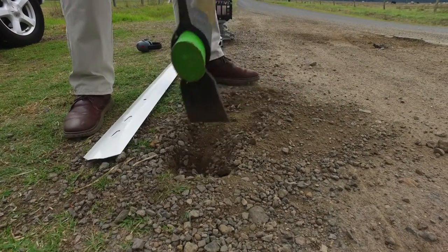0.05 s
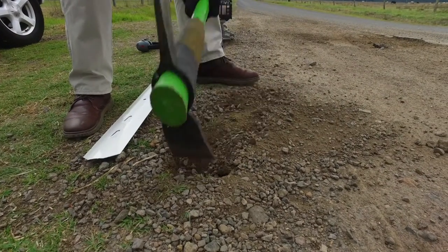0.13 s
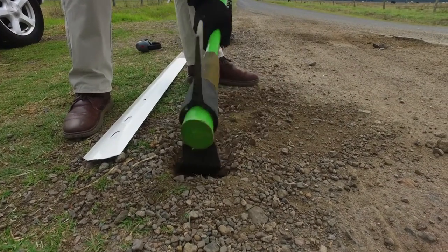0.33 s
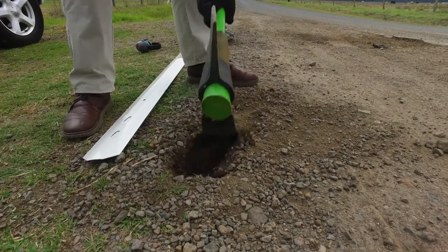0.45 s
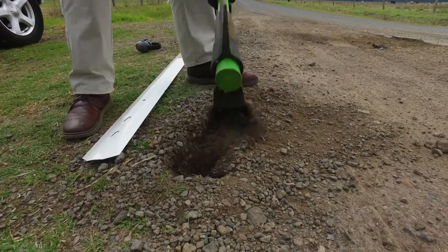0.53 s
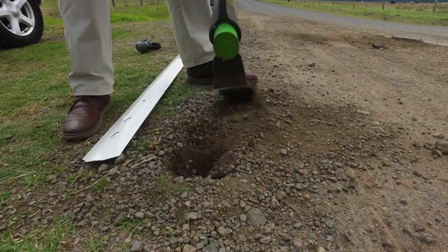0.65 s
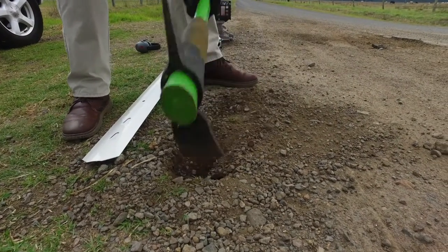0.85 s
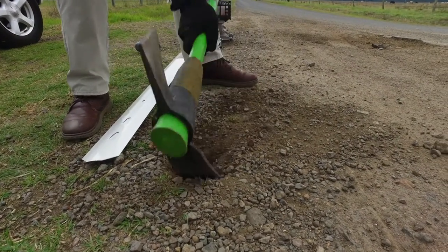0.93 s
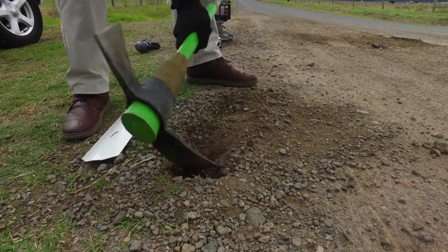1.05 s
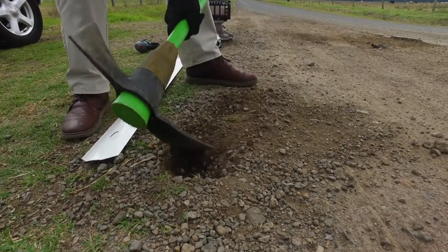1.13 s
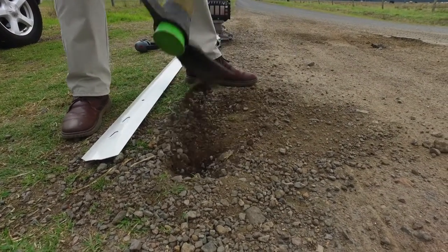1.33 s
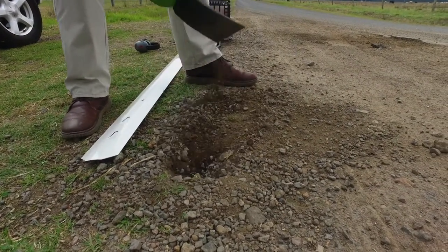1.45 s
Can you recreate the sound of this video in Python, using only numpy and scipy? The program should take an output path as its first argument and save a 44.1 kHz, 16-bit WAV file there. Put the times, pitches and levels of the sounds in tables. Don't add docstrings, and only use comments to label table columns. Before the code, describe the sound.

A steel mattock chops twice into hard roadside gravel, crunching, knocking stones, then dragging free with pebbles trickling

```python
import sys
import numpy as np
from scipy import signal
from scipy.fft import rfft, irfft
from scipy.io import wavfile
from scipy.ndimage import map_coordinates

SR = 44100
rng = np.random.default_rng(int(sys.argv[2]) if len(sys.argv) > 2 else 0)


def store_wav(level_fs):
    pcm = np.round(np.clip(np.atleast_2d(level_fs), -1, 1) * 32767)
    wavfile.write(sys.argv[1], SR, pcm.T.astype(np.int16))


def voltage_ratio(decibels):
    exponent = np.asarray(decibels, float) / 20
    return 10 ** exponent


N = 66150

# start_s, length_s, force_db, soil_share_db, steel_shake_db
BITES = [(0.2265, 0.019, -26.5, -5.5, -13.5), (0.2429, 0.0053, -26.5, 3, -32),
         (0.258, 0.035, -52.5, 2.5, -16), (0.295, 0.011, -39, 4, -18), (0.313, 0.026, -42, -2.5, -31),
         (0.348, 0.013, -47, 2, -8), (0.369, 0.022, -42.5, -6, -14), (0.394, 0.047, -43, -1, -20),
         (0.454, 0.0084, -48.5, -14, -2), (0.469, 0.0063, -42, 5.5, -28), (0.481, 0.031, -49.5, -6.5, -9.5),
         (0.9463, 0.005, -21, -46, -20), (0.953, 0.016, -27.5, -4, -33), (0.98, 0.02, -55, 5, -22),
         (1.02, 0.0052, -33, -8, -15), (1.031, 0.0096, -36.5, -4, -19), (1.054, .006, -40, -8.5, -26),
         (1.0699, 0.013, -34.5, -2, -20), (1.09, 0.021, -35.5, -7.5, -14.5), (1.115, 0.012, -30, -5, -19),
         (1.132, 0.013, -29.5, -11, -5), (1.149, 0.04, -37, -5, -4.5), (1.182, 0.027, -39, -5.5, -10.5),
         (1.227, 0.021, -46.5, -7.5, -5)]
BITE_ATTACK_S, BITE_T60_S = 0.0011, 0.022
CRUNCH_PER_S, CRUNCH_SPREAD_DB = 9000, 3
# pitch_hz, level_db
STONE_TONE = [(350, -28.5), (600, -4.5), (1730, -20.5), (3780, -1.5), (5480, -4.5), (7000, -10),
              (14600, -38), (15400, -39)]
# pitch_hz, level_db
SOIL_TONE = [(80, -38.5), (200, 2), (380, 0), (700, 0.5), (1200, -5), (2500, -6), (5000, -19), (12000, -43)]
CHIP_HZ, CHIP_SPREAD, CHIP_CYCLES, CHIP_DB = 3220, 0.41, 4.4, -10.5

BLADE_HELD_HZ = [910, 1225, 2400, 3150, 3450, 3920, 5965, 7745, 8840, 9910, 11700, 13100, 13750, 14700]
# level_db, t60_s
BLADE_HELD = [(-1.5, 0.037), (-5.5, 0.032), (-14, 0.025), (-3, 0.037), (-5, 0.047), (-8.5, 0.054),
              (-8, 0.048), (-15.5, 0.05), (-12, 0.031), (-19.5, 0.027), (-17.5, 0.051), (-20, 0.032),
              (-13.5, 0.032), (-19, 0.063),
              (-7, 0.045), (-7, 0.036), (-15, 0.07), (-19, .06), (-11, 0.044), (-23.5, 0.098), (-13.5, 0.07),
            (-19.5, 0.036), (-16, .07)]
BLADE_FREE_HZ = [2239, 3585, 4300, 6492, 6760, 7208, 8258, 8866, 9916, 11700, 12100, 13080, 13710, 14820]
# level_db, t60_s
BLADE_FREE = [(-10, 0.084), (-1, 0.072), (-4, 0.045), (-7.5, 0.29), (-11, 0.39), (-24, .15), (-7, 0.18),
              (-11.5, 0.08), (-23, 0.15), (-17, 0.12), (-10, 0.16), (-18, 0.16), (-19, 0.13), (-13.5, 0.2),
              (-6, .07), (-10, 0.068), (-19, .04), (-10.5, 0.065), (-19, 0.067), (-26, .13), (-32, .13),
            (-31, .13), (-15, .12)]
MORE_HELD_HZ = [1900, 2100, 4920, 5530, 6500, 6720, 8280, 10400, 12700]
MORE_FREE_HZ = [3930, 4900, 5620, 6020, 7720, 9200, 10700, 11000, 12600]
# pitch_hz, level_db
STEEL_TOP = [(14900, 0), (15300, -35)]
FREED_S, FREED_RISE_S, HELD_SHARE = 1.129, 0.026, 0.17
HELD_DB, FREE_DB = -15, -8.5
DAMP_DB, DAMP_PER_S = 3.5, 40

# start_s, peak_db, pitch_hz,
# t60_s
KNOCKS = [(0.2293, -23.5, 4000, 0.013), (.2295, -26, 5800, 0.017), (0.236, -19.5, 12000, 0.0073),
          (.2385, -21.5, 8940, 0.027), (0.2457, -21, 6010, 0.02), (0.246, -18, 3940, 0.033),
          (0.2556, -19, 1880, 0.011), (0.2976, -23.5, 3200, 0.026), (0.298, -30, 1910, .04),
          (.318, -31, 1960, .035), (0.358, -35, 8930, 0.012), (.3575, -39, 14000, .01),
          (0.358, -37, 10000, .012), (0.379, -33, 8970, .014), (0.379, -33, 13400, .014),
          (0.4125, -25.5, 3090, 0.028), (.426, -32, 2070, 0.02), (0.462, -36, 1900, 0.047),
          (0.472, -30, 3216, 0.071), (0.9468, -9, 3700, .014), (.9485, -5.5, 3700, 0.015),
          (0.9476, -9.5, 5980, .018), (0.9475, -12, 8350, 0.025), (.9472, -17, 9860, 0.031),
          (0.949, -23, 13200, 0.016), (0.9484, -22, 12300, .015), (0.9593, -15, 3180, 0.03),
          (0.9669, -17, 3120, .022), (1.0218, -27, 4780, .02), (1.023, -32.5, 9950, .025),
          (1.034, -24.5, 3710, 0.02), (1.055, -30, 3140, .02), (1.0732, -29, 3800, .025),
          (1.1161, -21, 4310, 0.027), (1.1326, -20, 4850, .03), (1.1337, -22.5, 4270, .03),
          (1.2291, -27, 3550, 0.026)]
CRACK_DB = -9
# start_s, peak_db, pitch_hz, t60_s
THUDS = [(.247, -9, 890, 0.018), (.2445, -18.5, 593, 0.038), (.25, -13, 174.5, 0.033),
         (0.245, -25.5, 82, 0.1), (.298, -27.5, 1293, 0.039), (.958, -21.5, 570, 0.009),
         (.9595, -24, 1240, 0.048), (.964, -24.5, 900, 0.022), (.966, -27, 560, 0.031),
         (1.078, -26.5, 227, 0.04), (1.132, -25, 109, 0.07)]
# start_s, peak_db, pitch_hz
PEBBLES = [(0.0024, -30.5, 5300), (0.0207, -55, 5600), (0.063, -45, 5530), (0.0749, -36, 11470),
           (0.1144, -39.5, 5800), (0.545, -51, 6400), (.558, -48, 11000), (.5832, -42, 5590),
           (0.595, -35, 6250), (0.63, -30.5, 5730), (0.6506, -33, 5170), (0.658, -30, 5280),
           (0.667, -33, 5270), (0.692, -39, 11000), (0.6985, -27, 13600), (0.6974, -35.5, 9100),
           (0.7135, -45, 12500), (0.721, -33, 5500), (0.7491, -22, 6260), (0.752, -30, 8900),
           (0.764, -32, 5500), (.7714, -43, 11500), (.7765, -41, 12000), (.7835, -40, 12500),
           (0.7883, -40, 9000), (0.8271, -39, 11600), (0.832, -41, 8900), (0.8422, -45, 6030),
           (1.293, -36.5, 12000), (1.324, -51, 14000), (1.3323, -40, 9000), (1.3374, -37, 12900),
           (1.342, -31, 5570), (1.3458, -35, 8200), (1.378, -29.5, 5500), (1.3917, -28, 5600),
           (1.4038, -44, 11900), (1.414, -42, 12000), (1.4233, -41, 9000), (1.4446, -28.5, 4130),
           (1.454, -33, 5500)]
# time_s, level_db
TRICKLE = [(0, -55), (.1, -69), (.17, -74), (.22, -69), (.48, -68), (.55, -64), (.7, -62.5), (.788, -65.5),
           (.8, -75), (.94, -87), (1.28, -84), (1.33, -60.5), (1.36, -66), (1.44, -53.5), (1.5, -60)]
# pitch_hz, level_db
GRIT_TONE = [(1500, -9.5), (3500, -2), (6000, -2), (10000, -5), (14000, -3.5), (16500, -7.5)]
GRIT_PER_S, GRIT_SPREAD_DB = 700, 5

# time_s, level_db
WIND = [(0.0, -51), (1.386, -51.5), (1.5, -51.5)]
# pitch_hz, level_db
WIND_TONE = [(8.8, -31), (15, -4), (64, -8), (86, -12), (231, -31), (349, -30.5), (400, -27.5), (520, -44),
             (880, -120)]
# pitch_hz, level_db
AIR_TONE = [(88, -36.5), (150, -2.5), (383, -17), (466, -6), (716, -9.5), (821, -9.5), (1830, -22.5),
            (3920, -21), (16000, -49.5)]
AIR_DB, INSECT_HZ, INSECT_WIDTH_HZ, INSECT_DB = -61.5, 3970, 560, -68.5
# start_s, end_s, pitch_hz, width_hz, level_db
FAR_WHIRR = (1.35, 1.55, 1640, 130, -62)
SCATTER_DB, SCATTER_T60_S = -10, 0.045
# pitch_hz, level_db
MIC_TONE = [(14500, -1.5), (15300, -4), (16000, -16), (16700, -55)]


def blade():
    t = np.arange(N) / SR
    start, length, force_db, soil_db, shake_db = np.transpose(BITES)[:, :, None]
    attack = np.clip((t - start) / BITE_ATTACK_S, 0, 1)
    bite = attack * voltage_ratio(force_db - 60 * np.clip(t - start - length, 0, 1) / BITE_T60_S)
    force = bite.sum(0)
    soil_force = (bite * voltage_ratio(soil_db)).sum(0)
    shake = (bite * voltage_ratio(shake_db + 5.5)).sum(0)

    push = grains(CRUNCH_PER_S, CRUNCH_SPREAD_DB) * voltage_ratio(2.3 * wobble(200))
    freed = np.clip((t - FREED_S) / FREED_RISE_S, HELD_SHARE, 1)
    held_drive = push * (force + shake) * (1.1 - freed)
    held = steel(held_drive, BLADE_HELD_HZ + MORE_HELD_HZ, BLADE_HELD, 3.37)
    loose = steel(push * shake * freed, BLADE_FREE_HZ + MORE_FREE_HZ, BLADE_FREE, 2.2)
    ringing = coloured(voltage_ratio(HELD_DB) * held + voltage_ratio(FREE_DB) * loose, STEEL_TOP)

    soil_push = grains(CRUNCH_PER_S / 3, CRUNCH_SPREAD_DB) * voltage_ratio(2.0 * wobble(149.55))
    soil = voltage_ratio(-4.0) * coloured(soil_push * soil_force, SOIL_TONE)
    stone = voltage_ratio(-13.5) * coloured(push * force, STONE_TONE)
    return stone + voltage_ratio(CHIP_DB) * chips(1500) * force + soil + ringing


def steel(drive, pitches, modes, shift_db):
    shift = voltage_ratio(shift_db * wobble(50.4))
    damp = voltage_ratio(DAMP_DB * wobble(DAMP_PER_S))

    def turn(curve):
        return np.roll(curve, int(rng.random() * N))

    total = np.zeros(N)
    for hz, (db, t60) in zip(pitches, modes):
        total += voltage_ratio(db) * turn(damp) * mode(drive * turn(shift), hz, t60)
    return total


def chips(count):
    u, t = rng.random((count, 3)), np.arange(200) / SR
    hz = np.clip(CHIP_HZ * np.exp(CHIP_SPREAD * rng.standard_normal((count, 1))), 500, 14000)
    strength_db = -4 * np.log(u[:, 1:2] + 0.023)
    notes = voltage_ratio(strength_db - 60 * t * hz / CHIP_CYCLES) * np.sin(2 * np.pi * hz * t)
    at = (u[:, :1] * N).astype(int) + np.arange(len(t))
    return unit(np.bincount(at.ravel(), notes.ravel(), N)[:N])


def stones():
    fade_db = -60 * np.arange(4000) / SR / 0.0088
    notes, cracks = [], []
    for s, db, hz, t60 in KNOCKS:
        notes.append((s, voltage_ratio(db - 6.0) * ring(hz, t60, size=4000)))
        cracks.append((s, voltage_ratio(db + CRACK_DB - 4 + fade_db) * rng.standard_normal(4000)))
    return place(notes) + coloured(place(cracks), STONE_TONE)


def thuds():
    t = np.arange(16000) / SR
    return place((s, voltage_ratio(db) * ring(hz, t60) * (1 - np.exp(-t * hz * 4.9))) for s, db, hz, t60 in THUDS)


def pebbles():
    t = np.arange(900) / SR
    envelope = 0.9 * voltage_ratio(-60 * t / 0.00094) + 0.072 * voltage_ratio(-60 * t / 0.046)

    def tick(db, hz):
        b, a = signal.butter(2, hz / SR, 'high')
        thin = unit(signal.lfilter(b, a, rng.standard_normal(900)))
        return voltage_ratio(db) * (0.33 * ring(hz, 0.0038, size=900) + thin * envelope)

    ticks = place((s, tick(db, hz)) for s, db, hz in PEBBLES)
    level_db, = curves(TRICKLE)
    grit = grains(GRIT_PER_S, GRIT_SPREAD_DB) + 0.85 * rng.standard_normal(N)
    return coloured(ticks + voltage_ratio(level_db + 2.9 * wobble(59.5)) * grit, GRIT_TONE)


def field():
    t = np.arange(N) / SR
    wind_db, = curves(WIND)
    wind = voltage_ratio(wind_db + 4.0 + 2.66 * wobble(13.68)) * unit(coloured(rng.standard_normal(N), WIND_TONE))
    air = voltage_ratio(AIR_DB + 0.23 * wobble(3.8)) * unit(coloured(rng.standard_normal(N), AIR_TONE))
    insects = voltage_ratio(INSECT_DB + 2.0 * wobble(30.4)) * band(INSECT_HZ, INSECT_WIDTH_HZ)
    start, end, hz, width, db = FAR_WHIRR
    fade = np.clip(np.minimum(t - start, end - t) / 0.022, 0, 1)
    whirr = voltage_ratio(db + 3.8 * wobble(40.18)) * fade * band(hz, width)
    return wind + air + insects + whirr


def band(hz, width):
    return unit(mode(rng.standard_normal(N), hz, 1.4 / width))


def mode(x, hz, t60):
    r = voltage_ratio(-60 / t60 / SR)
    gain = np.sqrt(1 - r * r)
    poles = [1, -2 * r * np.cos(2 * np.pi * hz / SR), r * r]
    return signal.lfilter([gain, 0, -gain], poles, x) / np.sqrt(2)


def ring(hz, t60, size=16000):
    t = np.arange(size) / SR
    return np.sin(2 * np.pi * hz * t) * voltage_ratio(-60 * t / t60)


def grains(rate, spread_db):
    chance, sign, size = rng.random((3, N))
    return unit((chance < rate / SR) * np.sign(sign - .5) * voltage_ratio(-spread_db * np.log(size + 0.0073)))


def coloured(x, points):
    f, v = np.transpose(points)
    hz = np.fft.rfftfreq(8192, 1 / SR)
    cep = irfft(np.log(voltage_ratio(np.interp(np.log(hz + 1), np.log(f + 1), v)) + 1e-6))
    cep[1:4096] *= 2
    cep[4097:] = 0
    h = irfft(np.exp(rfft(cep)))
    return signal.fftconvolve(x, h / np.linalg.norm(h))[:N]


def place(rows):
    out = np.zeros(N + SR)
    for s, v in rows:
        out[round(s * SR):][:len(v)] += v
    return out[:N]


def curves(rows):
    s, *cols = np.transpose(rows)
    return [np.interp(np.arange(N) / SR, s, c) for c in cols]


def wobble(rate):
    return map_coordinates(rng.standard_normal(int(N * rate / SR) + 4), [np.arange(N) * rate / SR])


def unit(x):
    return x / np.sqrt(np.mean(x ** 2) + 1e-20)


def scene():
    near, ticks = blade() + stones(), pebbles()
    tail = rng.standard_normal(4000) * voltage_ratio(-60 * np.arange(4000) / SR / SCATTER_T60_S)
    wet = signal.fftconvolve(near + voltage_ratio(-1.5) * ticks, tail / np.linalg.norm(tail))[:N]
    return (near + ticks + thuds() + voltage_ratio(SCATTER_DB) * wet + field())[None]


def band_limit(x):
    return signal.sosfilt(signal.butter(12, 16590, fs=SR, output="sos"), x)


def record(dry):
    mix = 0.84 * coloured(dry[0], MIC_TONE)[None]
    return band_limit(mix)


dry = scene()
out = record(dry)
store_wav(out)
```